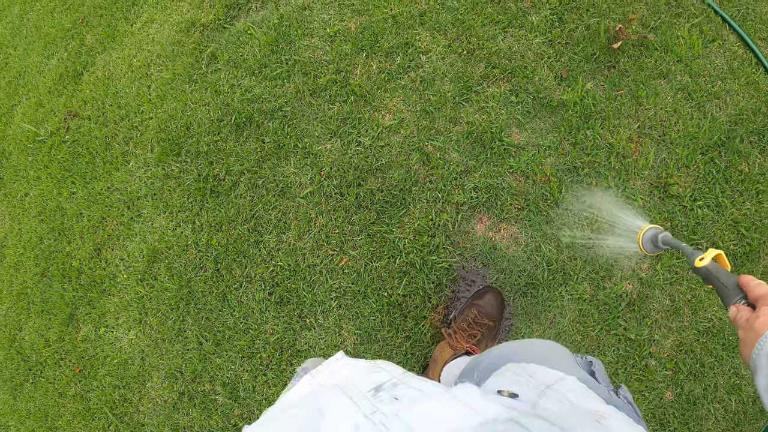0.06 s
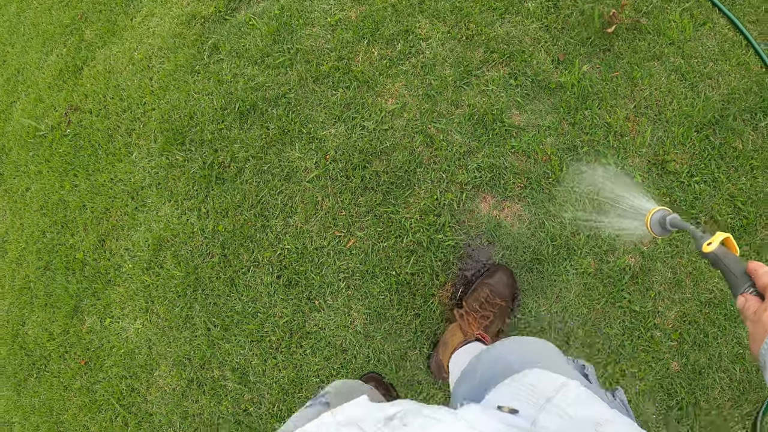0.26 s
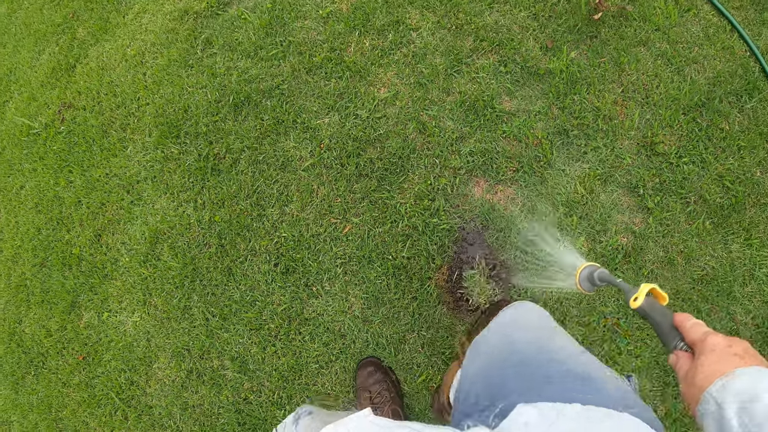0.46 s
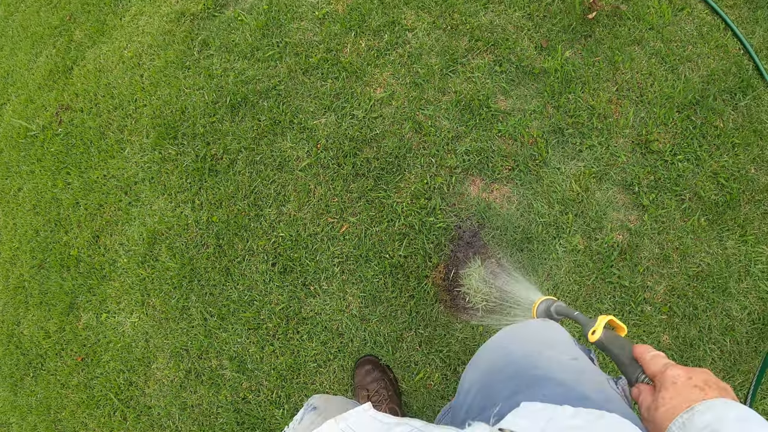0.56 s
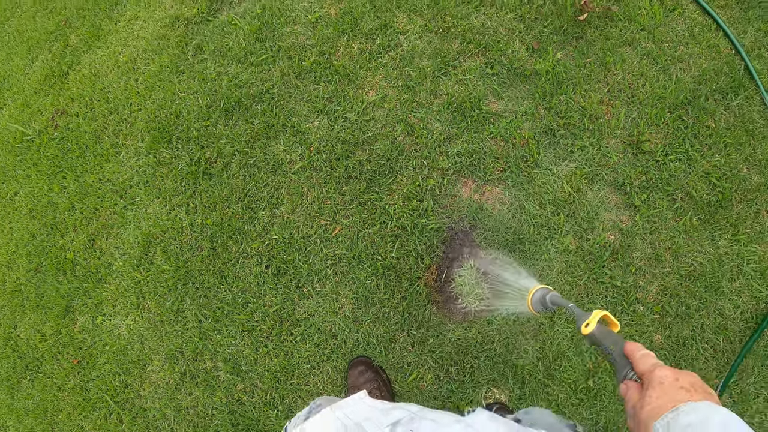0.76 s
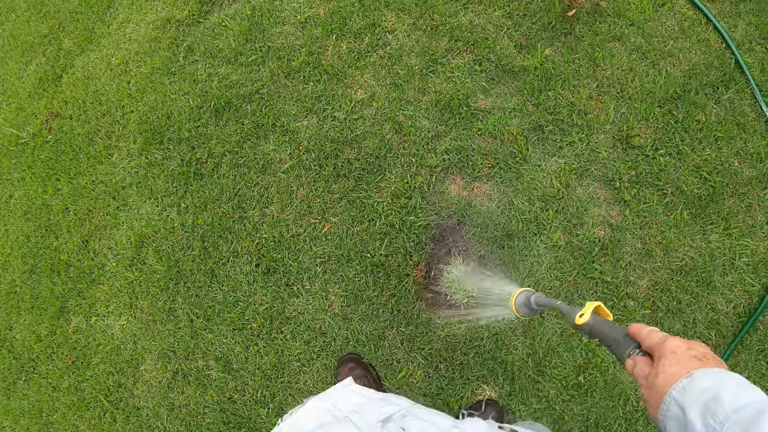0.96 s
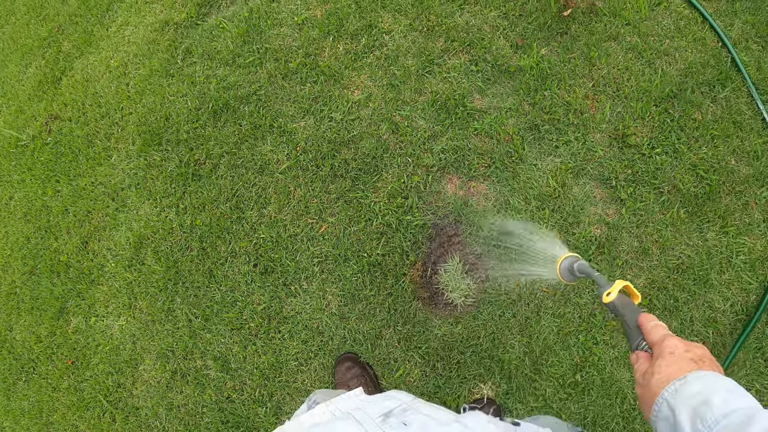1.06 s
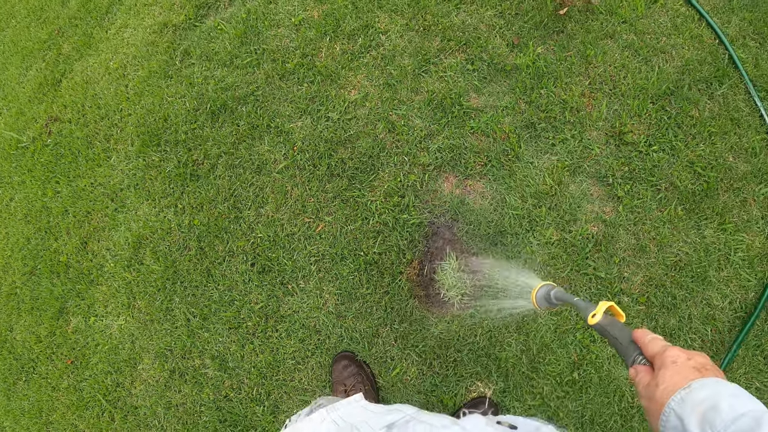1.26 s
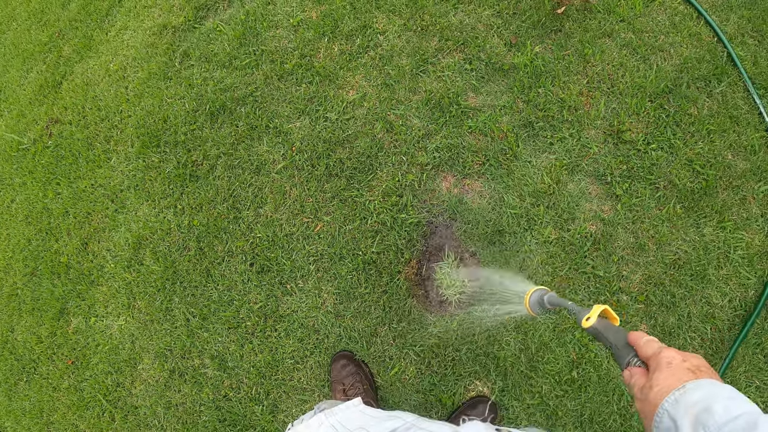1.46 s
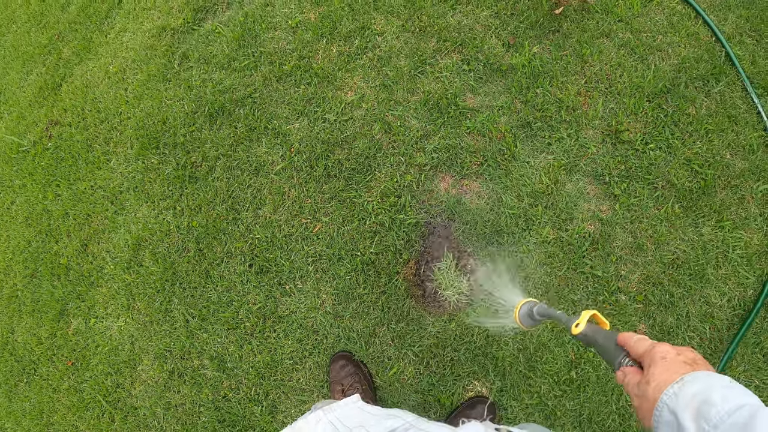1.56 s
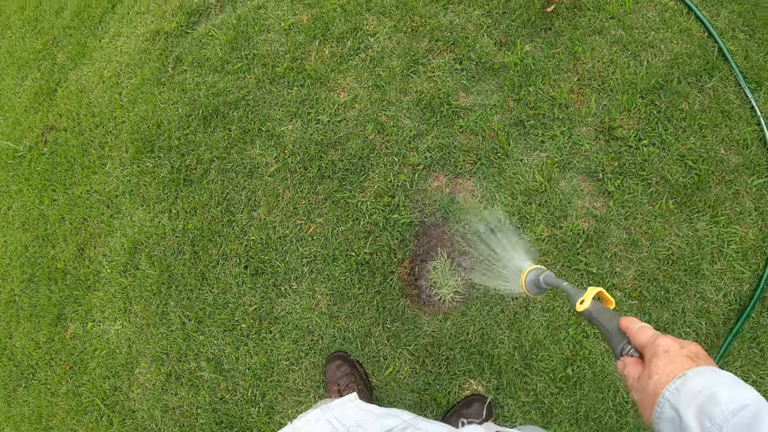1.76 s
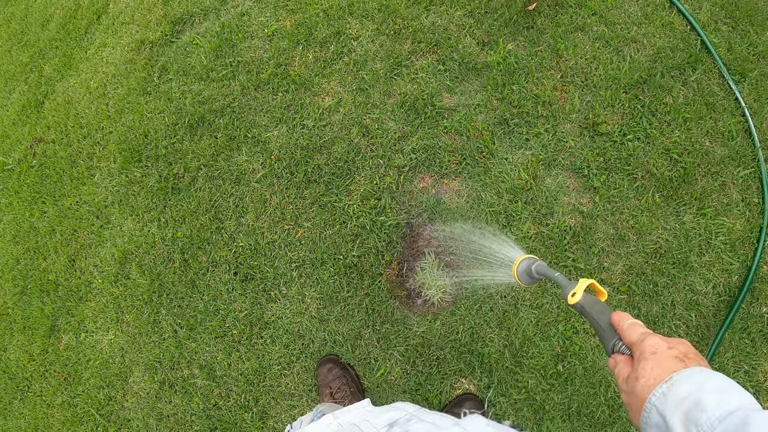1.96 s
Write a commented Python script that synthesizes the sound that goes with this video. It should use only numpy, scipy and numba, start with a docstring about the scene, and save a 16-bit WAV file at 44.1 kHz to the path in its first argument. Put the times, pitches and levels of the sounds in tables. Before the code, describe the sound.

Close outdoor stereo sound of a garden nozzle spraying a lawn: soft dull hiss first, a short wet squelch, then a brighter fluctuating patter on soggy bare ground, with small bubbles and faint low rumble underneath.

```python
"""Hose spray on grass and wet soil

A nozzle sprays a lawn about a metre from two microphone ports. Dense damped ticks make the drops: soft and dull
on grass, then louder and brighter as the spray is waved over wet bare soil. Rings that rise in pitch make a boot's
squelch, a gurgling puddle and one larger bubble. Steady-pitched rings make soft thumps; filtered noise, a low rumble.
"""
import sys
import numpy as np
from scipy import signal
from scipy.fft import rfft, irfft
from scipy.io import wavfile
from scipy.ndimage import uniform_filter1d
from numba import njit

SR = 44100
rng = np.random.default_rng(int(sys.argv[2]) if len(sys.argv) > 2 else 0)


def int16_out(signal):
    """Quantize to a 16-bit WAV file."""
    q = np.round(np.clip(np.atleast_2d(signal).T, -1, 1) * 32767)
    wavfile.write(sys.argv[1], SR, q.astype(np.int16))


N = 88200
HZ = np.maximum(np.fft.rfftfreq(N, 1 / SR), 1)  # frequency axis, kept above zero for logarithms and ratios
RIGHT_LEAD_SAMPLES = 7  # lead of the right port for gurgle, bubble and thumps


def undb(db):
    """Decibel law: 20 dB is a factor of ten in amplitude."""
    return 10 ** (np.asarray(db) / 20)


def over_hz(table, col=1):
    """Spectral envelope: a table column interpolated along log frequency."""
    table = np.array(table, float)
    return np.interp(np.log(HZ), np.log(table[:, 0]), table[:, col])


def over_time(table, col=1):
    """Temporal envelope: a table column interpolated along time."""
    table = np.array(table, float)
    return np.interp(np.arange(N) / SR, table[:, 0], table[:, col])


def unit(x):
    """Power normalization: scale to rms 1 over all channels together."""
    return x / np.sqrt(np.mean(x ** 2))


@njit
def grains(n, start, step, cycles, glide, size):
    """Damped oscillation: sines decay exponentially while their pitch glides; step is radians per sample."""
    y = np.zeros(n)
    for g in range(len(start)):
        length = cycles * 2 * np.pi / step[g]  # samples in which the ring falls by e**-3
        phase = 0.
        for i in range(min(int(2 * length), n - start[g])):
            y[start[g] + i] += size[g] * np.sin(phase) * np.exp(-3. * i / length)
            phase += step[g] * (1 + glide * i / length)
    return y


def ring(t, hz, cycles, glide, size):
    """Superposition: damped rings starting at times t (s) add into one signal."""
    start = (np.asarray(t) * SR).astype(np.int64)
    step = 2 * np.pi * np.asarray(hz) / SR
    return grains(N, start, step, 1. * cycles, 1. * glide, 1. * np.asarray(size))


def knocks(table, cycles, glide):
    """Impulse excitation: each row of a table starts one damped ring."""
    t, db, hz = np.array(table, float).T
    return ring(t, hz, cycles, glide, undb(db))


DROPS_PER_S, DROP_CYCLES = 24000, 2.5
DROP_SCATTER_DB = 1.8  # mean of the exponential scatter of drop strength


def patter():
    """Shot noise: random ticks of a few cycles, 600 to 15600 Hz, overlap and are evened to a flat spectrum."""
    when, pitch, strength, sign = rng.random((int(DROPS_PER_S * N / SR), 4)).T
    size = undb(-DROP_SCATTER_DB * np.log(1 - strength)) * np.sign(sign - .5)
    spec = rfft(ring(when * N / SR, 600 * 26 ** pitch, DROP_CYCLES, 0, size))
    smooth_power = uniform_filter1d(np.abs(spec) ** 2, size=801)
    return irfft(spec / np.sqrt(smooth_power), N)


def spray():
    """Partial coherence: near drops are heard by both ports, drops further out differ left and right."""
    near, far = patter(), patter()
    return near, far, np.roll(far, N // 2)  # half the length apart, the two far parts are unlike


# Colouring by the two microphone ports. Each row: frequency in Hz, relative response of the left port in dB,
# of the right port in dB, phase lead of the right port in radians, likeness of the ports from 0 to 1.
PORT_RESPONSE = [(700, -12.4, -14.5, 0.68, 0.83), (1050, -11.6, -10.2, 0.6, 0.86),
                 (1700, -4.3, -4.3, 0.37, 0.91), (2300, 0.0, -1.1, 0.73, 0.9),
                 (3100, -0.4, -2.1, 0.93, 0.87), (4100, -0.1, -1.8, 1.12, 0.85),
                 (5200, -3.7, -3.9, 0.98, 0.83), (5900, -4.7, -8.9, 1.28, 0.77),
                 (6400, -5.8, -13.9, 2.05, 0.63), (6900, -5.7, -10.6, 2.58, 0.81),
                 (7500, -5.6, -10.3, 3.1, 0.79), (8200, -13.4, -9.3, 2.53, 0.66),
                 (8900, -7.6, -6.3, 2.24, 0.81), (9500, -9.1, -7.0, 2.67, 0.83),
                 (10700, -18.1, -8.2, 2.77, 0.67), (11700, -21.4, -10.5, 2.25, 0.55),
                 (12800, -21.3, -11.8, 2.61, 0.57), (13700, -25.5, -15.7, 2.36, 0.57),
                 (14400, -26.9, -23.4, 2.87, 0.51), (15500, -32.8, -26.8, 2.87, 0.35)]


def ports(near, left, right, tilt_db=0, lead_us=0):
    """Interaural-style coherence: ports hear a shared and an own sound, coloured and shifted by the housing."""
    like = over_hz(PORT_RESPONSE, col=4)
    shared = np.sqrt(like) * rfft(near)
    own = np.sqrt(1 - like)
    turn = np.exp(1j * (over_hz(PORT_RESPONSE, col=3) + 2 * np.pi * HZ * lead_us / 10 ** 6))
    left_spec = (shared + own * rfft(left)) * undb(over_hz(PORT_RESPONSE, col=1))
    right_spec = (shared + own * rfft(right)) * undb(over_hz(PORT_RESPONSE, col=2)) * turn
    low_cut = HZ ** 2 / (HZ ** 2 + 500 ** 2)
    return irfft(low_cut * undb(tilt_db) * np.array([left_spec, right_spec]), N)


# Drops on wet soil as the spray sweeps on and off the patch. Each row: time in seconds, level of the middle
# band in dB, treble against that band in dB, low part against that band in dB.
SOIL_SWEEP = [(.6, -55, 0, -8), (.64, -48, 7.5, -23), (.69, -36.5, -5.5, -10), (.78, -36.5, -3, -9.5),
              (.87, -34.5, -4, -6.5), (.95, -36, -3.5, -9), (1.0, -37, -6, -14), (1.05, -35, -4.5, -9),
              (1.13, -32.5, -5, -9), (1.18, -34.5, -7.5, -6.5), (1.21, -43.5, -7, -16),
              (1.25, -54, -10, -8), (1.29, -38.5, -5.5, -10), (1.35, -34.5, -6.5, -11.5),
              (1.40, -34, -6, -7), (1.44, -39, -7, -9), (1.50, -31.5, -8.5, -14), (1.53, -35.5, -5.5, -11),
              (1.555, -37, -5.5, -5), (1.59, -34, -6, -7), (1.635, -34.5, -8.5, -7), (1.67, -43, -4, -11),
              (1.71, -35, -6.5, -6.5), (1.78, -36, -6, -6.5), (1.84, -33, -6.5, -11.5),
              (1.87, -40.5, 1.5, -1), (1.89, -39, -8.5, -24), (1.92, -40.5, 4, -4), (1.95, -31.5, -7, -12),
              (2.0, -37.5, -8, -6.5)]
# Spectral tilt of soil drops. Each row: frequency in Hz, relative level in dB.
SOIL_COLOUR = [(700, -1.5), (1400, -0.5), (2500, -1.5), (4500, -1.5), (8000, -1), (15000, 0.5)]
SOIL_IN_S, TREBLE_HZ, LOW_HZ = .05, 6530, 2226  # fade-in time and the band edges


def soil():
    """Time-varying spectrum: bright patter in three bands swells as the spray crosses the wet patch."""
    x = unit(ports(*spray(), over_hz(SOIL_COLOUR)))
    treble = irfft(rfft(x) / (1 + (TREBLE_HZ / HZ) ** 8), N)
    low = irfft(rfft(x) / (1 + (HZ / LOW_HZ) ** 8), N)
    bands = unit(x - treble - low)
    bands = bands + unit(treble) * undb(over_time(SOIL_SWEEP, col=2))
    bands = bands + unit(low) * undb(over_time(SOIL_SWEEP, col=3))
    fade = np.clip((np.arange(N) / SR - SOIL_SWEEP[0][0]) / SOIL_IN_S, 0, 1)
    return bands * undb(over_time(SOIL_SWEEP)) * fade


# Drops on grass. Each row: time in seconds, rms level over both ports in dB.
GRASS_LEVEL = [(0.0, -36.5), (0.18, -38), (0.364, -36), (0.382, -37.5), (0.6, -38)]
# Spectral tilt of grass drops. Each row: frequency in Hz, relative level in dB.
GRASS_COLOUR = [(700, -6.5), (1400, -4), (2500, -7), (4000, -9.5), (5500, -9), (6200, -8.5), (8000, -9),
                (9500, -7.5), (11000, -10), (13000, -8), (15000, -9)]
GRASS_LEAD_US = 12  # added lead of the right port, microseconds


def grass():
    """Spectral filtering: a tilt makes the patter on the blades softer and duller."""
    x = ports(*spray(), over_hz(GRASS_COLOUR), GRASS_LEAD_US)
    return unit(x) * undb(over_time(GRASS_LEVEL))


# Air pockets popping as a boot is pulled out of mud. Each row: start in seconds, starting amplitude in dB
# before the ports, starting pitch in Hz.
SQUELCH_POPS = [(.3338, -24, 2200), (.3365, -28, 1500), (.3410, -32, 1800), (.3502, -25, 1650),
                (.3525, -26, 2000), (.3543, -23, 1750), (.3575, -26, 1500), (.3600, -26, 1900),
                (.3622, -25, 1400), (.3645, -25, 1550), (.3668, -24, 1300), (.3690, -26, 1900),
                (.3720, -27, 1250), (.3765, -29, 1050), (.3795, -29, 1500)]
POP_CYCLES, POP_GLIDE = 6.5, .05  # glide: fractional rise in pitch over the cycles


def squelch():
    """Cavity resonance: air pockets pop in a quick run as damped rings that rise slightly in pitch."""
    pops = knocks(SQUELCH_POPS, POP_CYCLES, POP_GLIDE)
    return ports(pops, pops, pops, -over_hz(PORT_RESPONSE, col=1))  # cancels the left port's response


# Murmur of small bubbles in the wet ground. Each row: time in seconds, rms level in dB before panning.
GURGLE_LEVEL = [(0, -50), (.1, -76), (.22, -74), (.35, -68), (.55, -57.5), (.7, -71), (.92, -64.5),
                (1.03, -49.5), (1.1, -57), (1.17, -54), (1.23, -45.5), (1.3, -56), (1.38, -74), (1.65, -57),
                (1.85, -59.5), (1.92, -66), (2, -42.5)]
GURGLE_PER_S, GURGLE_HZ, GURGLE_CYCLES, GURGLE_GLIDE = 600, 500, 10, .05
GURGLE_SPREAD = .15  # standard deviation of log pitch
GURGLE_OWN_DB = -8  # bubbles heard by one port only, against the shared ones


def bubble_murmur():
    """Bubble resonance: many small rings of random strength overlap around one pitch."""
    count = int(GURGLE_PER_S * N / SR)
    when = rng.random(count) * N / SR
    hz = GURGLE_HZ * np.exp(GURGLE_SPREAD * rng.standard_normal(count))
    return ring(when, hz, GURGLE_CYCLES, GURGLE_GLIDE, rng.standard_normal(count))


def gurgle():
    """Partial coherence: a shared bubble murmur reaches both ports, a weaker one of its own each."""
    both, left, right = bubble_murmur(), bubble_murmur(), bubble_murmur()
    own = undb(GURGLE_OWN_DB)
    x = np.array([both + own * left, np.roll(both, -RIGHT_LEAD_SAMPLES) + own * right])
    return unit(x) * undb(over_time(GURGLE_LEVEL))


# One larger bubble. Each row: start in seconds, starting amplitude in dB before panning, starting pitch in Hz.
LARGE_BUBBLE = [(1.9510, -31, 365)]


def bubble():
    """Bubble resonance: a larger bubble rings lower, its pitch rising as it decays."""
    return knocks(LARGE_BUBBLE, cycles=6, glide=.3)


# Soft low thumps. Each row: start in seconds, starting amplitude in dB before panning, pitch in Hz.
LOW_THUMPS = [(1.869, -33, 55), (1.997, -30, 90)]


def thumps():
    """Heavy damping: low rings of steady pitch die within a few cycles."""
    return knocks(LOW_THUMPS, cycles=2.5, glide=0)


# Spectrum of the rumble. Each row: frequency in Hz, relative density in dB per Hz before the low-pass filters.
RUMBLE_COLOUR = [(12, -30), (22, -12), (33, -4), (42, -4), (54, 1.5), (66, -4), (108, -5), (140, -10.5),
                 (174, -10), (270, -16.5), (480, -21.5), (850, -29.5), (1300, -19)]
# Swell of its part below about 180 Hz. Each row: time in seconds, level in dB before panning.
RUMBLE_SWELL = [(0.0, -42), (0.53, -49.5), (0.56, -41.5), (0.61, -51.5), (0.63, -41.5), (0.73, -53.5),
                (0.76, -48), (0.93, -42), (0.96, -50.5), (1.15, -44), (1.33, -40.5), (1.42, -51.5),
                (1.52, -45), (1.6, -51), (1.67, -46.5), (1.88, -42.5), (1.9, -48.5), (2.0, -39.5)]
RUMBLE_LIKE, RUMBLE_LEAD_RAD = .86, .36  # likeness of the ports (0-1), phase lead of the right port
RUMBLE_UPPER_DB = -51  # gain of the steady part above about 180 Hz, before panning


def rumble():
    """Filtered noise: low noise, nearly alike on both ports, wavers in level under a steady upper part."""
    noise = rfft(rng.standard_normal((3, N)))
    both, left, right = noise * undb(over_hz(RUMBLE_COLOUR)) / (1 + (HZ / 900) ** 4)
    shared, own = np.sqrt(RUMBLE_LIKE) * both, np.sqrt(1 - RUMBLE_LIKE)
    turn = np.exp(1j * RUMBLE_LEAD_RAD)
    x = unit(irfft(np.array([shared + own * left, (shared + own * right) * turn]), N))
    low = irfft(rfft(x) / (1 + (HZ / 180) ** 4), N)
    return low * undb(over_time(RUMBLE_SWELL)) + (x - low) * undb(RUMBLE_UPPER_DB)


LOWS_PAN_DB = 3.6  # left against right


def scene():
    """Linear superposition: spray and boot add to the left-leaning puddle, thumps and rumble."""
    near = bubble() + thumps()
    lows = gurgle() + np.array([near, np.roll(near, -RIGHT_LEAD_SAMPLES)]) + rumble()
    pan = undb(np.array([[.5], [-.5]]) * LOWS_PAN_DB)
    return soil() + grass() + squelch() + lows * pan


TOP_HZ = 15420


def record(dry):
    """Band limiting: a steep elliptic low-pass, the camera's, cuts the top."""
    return signal.sosfilt(signal.ellip(10, .2, 80, TOP_HZ, fs=SR, output="sos"), dry)


dry = scene()
out = record(dry)
int16_out(out)
```